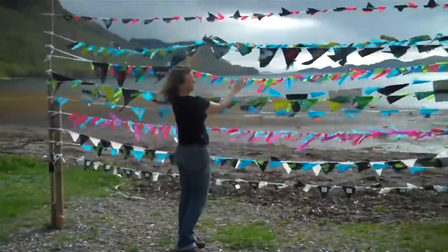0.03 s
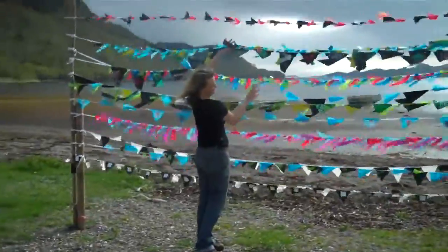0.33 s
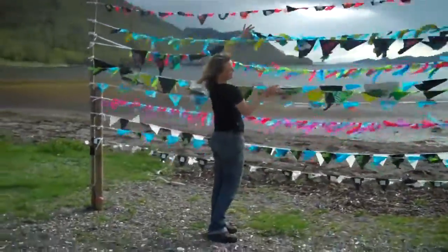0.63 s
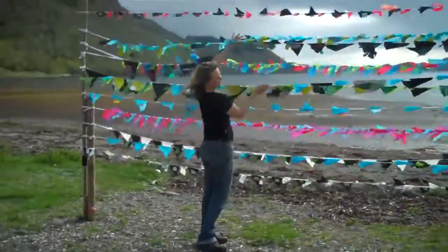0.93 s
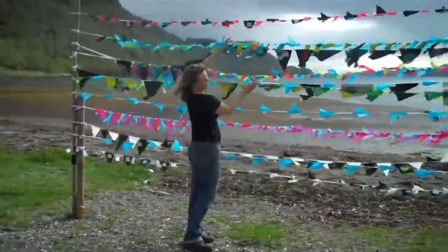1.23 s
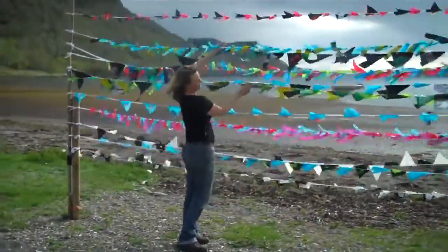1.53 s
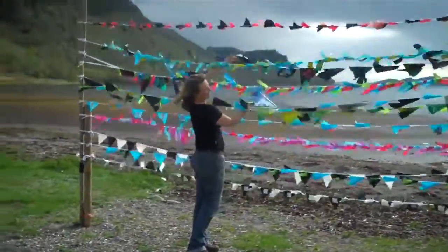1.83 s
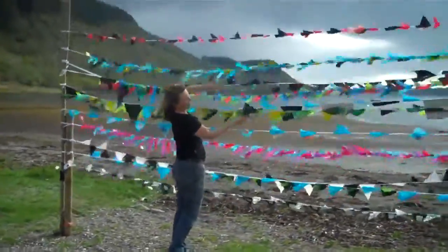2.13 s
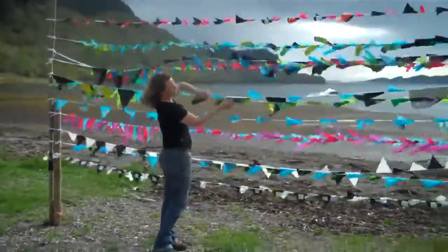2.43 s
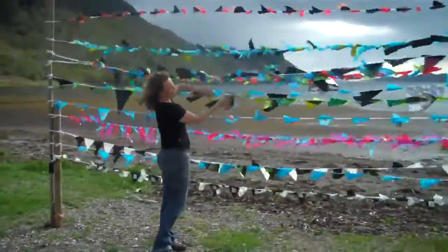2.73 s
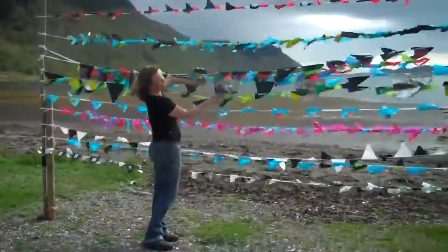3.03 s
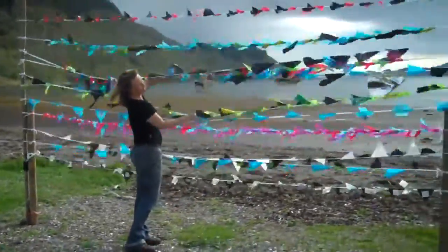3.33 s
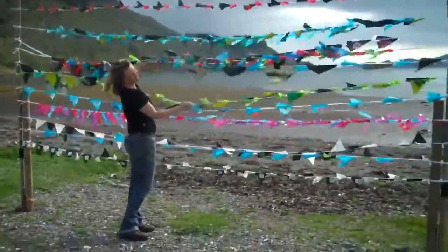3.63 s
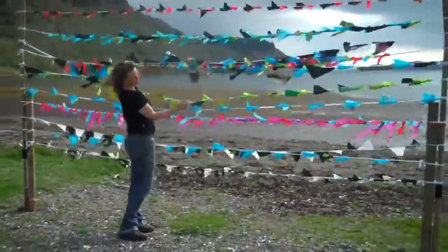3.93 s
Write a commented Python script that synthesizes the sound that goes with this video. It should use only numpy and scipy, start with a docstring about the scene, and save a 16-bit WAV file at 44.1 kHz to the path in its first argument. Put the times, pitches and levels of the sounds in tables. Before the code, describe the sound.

Many plastic flags flutter outdoors in a bright, crackly hiss, with occasional soft swishes and sharp cracks. Uneven wind buffets the microphone throughout, growing stronger on the right side from about halfway.

```python
"""Strings of small plastic flags rustle on an open shore, with wind rumbling on the microphone.
Close by, every flap is a brief spray of crackles; the far flags merge into a hiss. Now and then a slack
flag swishes round, or a near one cracks like a whip. Gusts rumble and thump on the two microphone ports,
mostly the right one, and the hardest thumps make the recorder's limiter duck the rustle."""
import sys
import numpy as np
from scipy import signal
from scipy.fft import rfft, irfft
from scipy.io import wavfile
from scipy.ndimage import uniform_filter1d

SR = 44100
rng = np.random.default_rng(int(sys.argv[2]) if len(sys.argv) > 2 else 0)


def generate_wav(sig):
    """Save sig (samples, or channels by samples) to the path in sys.argv[1] as 16-bit PCM at SR."""
    pcm = np.round(np.clip(np.atleast_2d(sig).T, -1, 1) * 32767).astype(np.int16)
    wavfile.write(sys.argv[1], SR, pcm)


N = 176400
TIME = np.arange(N) / SR
FREQS = np.maximum(np.arange(N // 2 + 1) * SR / N, 1)
CRACKLES_PER_S = 4000   # within a flap or a swish


def from_db(db):
    """Decibels to gain."""
    return 10 ** (np.asarray(db) / 20)


def unit_rms(x):
    """Scale to unit power."""
    return x / np.sqrt(np.mean(x ** 2) + 1e-20)


def in_time(rows):
    """Join (seconds, value) rows into a curve at every sample."""
    return np.interp(TIME, *np.transpose(rows))


def lowpass(x, hz, order=2):
    """Butterworth low-pass."""
    return signal.sosfilt(signal.butter(order, hz, fs=SR, output="sos"), x)


def die_away(kicks, decay_s):
    """Give every kick an exponential tail."""
    return signal.lfilter([1], [1, -np.exp(-1 / (decay_s * SR))], kicks + 1e-18)


def drift(hz):
    """Random motion of spread 1, mostly slower than hz."""
    return unit_rms(irfft(rfft(rng.standard_normal(N)) / (1 + (FREQS / hz) ** 2), N))


def colour(x, table):
    """Minimum-phase filter that follows (Hz, left dB, right dB) rows, scaled to unit mean power gain."""
    hz, *sides = np.transpose(table)
    gain = unit_rms(from_db([np.interp(np.log(FREQS), np.log(hz), side) for side in sides]))
    cepstrum = irfft(np.log(gain), N)
    cepstrum[:, 1:N // 2] *= 2
    cepstrum[:, N // 2 + 1:] = 0
    return irfft(rfft(x) * np.exp(rfft(cepstrum)), N)


def eddies(per_s=60, spread_db=4, decay_s=0.011, rise_hz=258, steady_flow=0.2):
    """Force of the air on a port: a steady flow plus uneven shoves that come fast and die away."""
    rate = per_s * np.exp(np.tanh(drift(per_s)))
    onsets = np.diff(np.floor(np.cumsum(rate) / SR), prepend=0)
    shoves = onsets * from_db(spread_db * rng.uniform(-1.5, 2, N))
    return steady_flow + lowpass(die_away(shoves, decay_s), rise_hz)


# Gusts off the open shore, on the left and right port. Each row: time in seconds, relative level in dB.
GUSTS_LEFT = [(0.0, -22.5), (0.03, -22.5), (0.17, -22.5), (0.2, -29.5), (0.25, -24.5), (0.39, -30),
              (0.51, -27.5), (0.61, -42.5), (0.8, -32), (0.871, -51), (0.99, -24.5), (1.08, -25),
              (1.14, -52), (1.35, -33), (1.41, -23.5), (1.53, -45.5), (1.67, -60), (1.78, -20.5),
              (1.81, -26.5), (1.84, -24), (1.88, -22), (2.18, -49.5), (2.23, -34), (2.34, -25.5),
              (2.49, -50.5), (2.68, -38), (2.718, -22.5), (2.84, -37), (2.95, -23), (2.99, -29),
              (3.23, -45), (3.27, -29), (3.3, -44), (3.48, -20.5), (3.54, -31), (3.57, -32.5), (3.6, -30),
              (3.7, -30.5), (3.92, -27), (3.99, -41)]
GUSTS_RIGHT = [(0.0, -28.5), (0.04, -25.5), (0.14, -21.0), (0.17, -27), (0.24, -26.0), (0.38, -35.0),
               (0.5, -23.5), (0.56, -33), (0.62, -24), (0.65, -32.5), (0.68, -24), (0.91, -26.5),
               (0.94, -23.0), (1.18, -37), (1.22, -23), (1.36, -27.5), (1.42, -36), (1.46, -29.5),
               (1.53, -33.5), (1.56, -27.5), (1.59, -38), (1.68, -37.5), (1.8, -28.5), (1.83, -16.5),
               (1.921, -14.5), (1.95, -24), (1.97, -27.0), (2.14, -32), (2.17, -18), (2.19, -25),
               (2.31, -27), (2.35, -35.0), (2.44, -27.5), (2.47, -38.5), (2.59, -30.5), (2.64, -37),
               (2.7, -26), (2.74, -29.0), (2.78, -19.0), (2.98, -15.5), (3.01, -20.0), (3.14, -14),
               (3.2, -27.0), (3.24, -22), (3.29, -32), (3.44, -16.0), (3.47, -19), (3.63, -28.5),
               (3.77, -29.0), (3.8, -24.5), (3.87, -35.5), (3.97, -21.5), (3.99, -30.5)]
# Their rumble at the microphone. Each row: frequency in Hz, left and right relative level in dB.
RUMBLE_SPECTRUM = [(20, -25, -32), (45, -21, -16), (86, 1.5, -4), (172, 4, 0.5), (275, -2.5, -0.5),
                   (454, -6, -7.5), (678, -12, -13), (1068, -19, -24), (2030, -33, -40.5), (4000, -56, -61)]


def wind(trims_db=(-1, 0.8), references_db=(-26, -14.5), bright_above_hz=490, bright_db_per_db=0.51):
    """Lumpy rumble, separate on each port; stronger wind stirs finer eddies and sounds brighter."""
    rumbles = colour(rng.standard_normal((2, N)), RUMBLE_SPECTRUM)
    ports = []
    for rumble, gusts, trim, reference in zip(rumbles, (GUSTS_LEFT, GUSTS_RIGHT), trims_db, references_db):
        lumps = np.abs(eddies())
        lumps /= np.sqrt(uniform_filter1d((lumps * rumble) ** 2, size=2600))   # even power over 59 ms
        force = from_db(in_time(gusts) + trim) * lumps
        coarse = irfft(rfft(rumble) / (1 + (FREQS / bright_above_hz) ** 4), N)
        fine = (rumble - coarse) * (force / from_db(reference)) ** bright_db_per_db
        ports.append(force * (coarse + fine))
    return np.array(ports)


# Eddies striking the microphone itself. Each row: centre in seconds, left and right level of the swing
# in dB, pitch in Hz, half length in seconds.
EDDY_HITS = [(.152, -7.5, -27.5, 350, 0.0019), (.248, -12, -18, 272, 0.0025),
             (0.332, -23.5, -32, 480, 0.0047), (0.476, -25, -34, 436, 0.002),
             (0.677, -14.5, -39.5, 266, 0.0016), (0.834, -32, -21, 455, 0.0015),
             (0.929, -20, -13, 157, 0.0037), (1.008, -18.5, -24, 645, 0.00055),
             (1.054, -26, -27, 543, 0.0026), (1.412, -19, -39, 400, .0015), (1.429, -15, -39, 550, 0.00083),
             (1.766, -5.5, -32, 403, 0.0011), (1.818, -43, -1.5, 287, .003), (1.849, -23, -10, 565, 0.0024),
             (1.878, -30, -3, 465, 0.00068), (1.917, -35.5, -3, 426, 0.0011),
             (2.167, -45.5, -8.5, 484, 0.0027), (2.222, -29, -4.5, 387, 0.0038),
             (2.280, -22, -8, 223, 0.002), (2.33, -15.5, -47, 388, 0.0021),
             (2.711, -13, -28.5, 750, 0.00046), (2.785, -33, -13, 408, 0.003),
             (2.835, -38.5, -8, 282, 0.0032), (2.911, -13, -5.5, 211, 0.0026),
             (2.921, -35.5, -1, 213, 0.0037), (2.964, -13, 6, 650, 0.00058), (2.971, -13.5, 2, 281, 0.0044),
             (3.055, -29.5, -7, 330, 0.0013), (3.121, -26, -1.5, 410, 0.0013),
             (3.236, -32, -6, 273, 0.0012), (3.317, -34, -12.5, 246, 0.0038), (3.392, -27, -5, 308, 0.0013),
             (3.422, -18.5, -10.5, 200, 0.0013), (3.457, -11, 1, 267, 0.0036),
             (3.646, -23, -15.5, 420, 0.0017), (3.702, -10.5, -23, 260, 0.0026)]


def thumps(roughness=0.23, rough_hz=1990, growth=0.57):
    """Single eddies: a pressure swing of a cycle or two, the more ragged and bright the harder it hits."""
    out = np.zeros((2, N))
    for centre_s, left_db, right_db, hz, half_s in EDDY_HITS:
        span = np.abs(TIME - centre_s) < .03
        age = TIME[span] - centre_s
        strength = from_db([[left_db], [right_db]])
        violence = strength.max() ** growth   # 1 for a full-scale hit
        top_hz = min(rough_hz * violence, SR / 4)
        ragged = unit_rms(lowpass(rng.standard_normal((2, SR // 10)), top_hz, order=6))[:, :len(age)]
        swing = np.sin(2 * np.pi * (hz * age + rng.random()))
        envelope = strength * np.exp(-(age / half_s) ** 2)
        out[:, span] += envelope * (swing + roughness * violence * ragged)
    return out


# Slack flags, heard alike on both ports. Each row: centre in seconds, level in dB.
SLACK_SWEEPS = [(.285, -41), (.385, -39), (.435, -37.5), (.60, -46), (.72, -42.5), (.92, -42), (1.065, -41),
                (2.70, -36), (3.87, -42)]


def swishes(centre_hz=2750, log_width=0.53, half_s=0.016):
    """A slack flag sweeps round with a duller swish: a brief swell of soft midrange crackle."""
    grains = rng.standard_normal(N) * (rng.random(N) < CRACKLES_PER_S / SR)
    band = np.exp(-(np.log(FREQS / centre_hz) / log_width) ** 2 / 2)
    crackle = unit_rms(irfft(rfft(grains) * band, N))
    swells = sum(from_db(db) * np.exp(-((TIME - s) / half_s) ** 2) for s, db in SLACK_SWEEPS)
    return crackle * swells


def flag_string(effort_db, flaps_per_s=22, jitter=.25, flap_spread_db=6.5, crackle_spread_db=2.5,
                swell_db=3, near_db=-6, far_db=-2):
    """A near flag flaps unevenly, faster in more wind, each flap a dying spray over the far flags' hiss."""
    rate = flaps_per_s * from_db(effort_db / 2) * np.exp(jitter * (rng.normal() + drift(hz=10)))
    onsets = np.diff(np.floor(rng.random() + np.cumsum(rate) / SR), prepend=0)
    flaps = onsets * from_db(flap_spread_db * rng.uniform(-1.9, 2, N))
    spray = lowpass(die_away(flaps, decay_s=0.0029), hz=89, order=1)   # each flap takes a moment to build
    clicks = (rng.random(N) < CRACKLES_PER_S / SR) * rng.choice([-1, 1], N)
    crackles = clicks * from_db(crackle_spread_db * rng.uniform(-0.96, 1.1, N))
    swell = from_db(swell_db * np.tanh(drift(hz=2.8)))
    near = from_db(near_db) * unit_rms(spray * crackles * swell)
    far = from_db(far_db) * rng.standard_normal(N)
    return from_db(effort_db) * (near + far)


# How hard the flags flutter in front of the microphone. Each row: time in seconds, relative level in dB.
FLUTTER_EFFORT = [(0, -1), (.27, -2.5), (.5, -1.5), (.6, .5), (.68, -1.5), (.82, -1), (.9, 1), (1.0, -1),
                  (1.14, 0.5), (1.35, -1), (1.53, 1), (1.85, -2.5), (2.1, .5), (2.24, 1), (2.37, 4),
                  (2.56, 4), (2.61, 2), (2.8, 2), (3.02, .5), (3.3, 2.5), (3.52, 0.8), (3.64, 2), (3.82, 1),
                  (3.97, 2)]


def flags(strings=12, ripple_db=0.84, tint_db=1, edge_lag_s=4.5e-5, right_lead_s=2.2e-5):
    """Strings spread across the shore, each with its own colour and its own lag between the ports."""
    effort_db = in_time(FLUTTER_EFFORT) + ripple_db * drift(hz=12)   # all share the breeze's quick changes
    knots_hz = np.geomspace(1000, SR / 2, strings)
    spread = np.linspace(-1, 1, strings)
    spectrum = 0
    for place in spread:
        tint = from_db(-tint_db * np.interp(FREQS, knots_hz, rng.permutation(spread)))
        left_lead_s = place * edge_lag_s - right_lead_s
        arrival = np.exp(1j * np.pi * FREQS * left_lead_s * np.array([[1], [-1]]))
        spectrum = spectrum + rfft(flag_string(effort_db)) * tint * arrival
    return irfft(spectrum, N) / np.sqrt(strings)


# A flag cracks close to the microphone. Each row: start in seconds, level in dB relative to the flutter.
WHIP_CRACKS = [(0.597, 16.5), (1.9421, 22), (2.076, 8.5), (2.303, 5), (2.928, 7.5), (3.162, 14),
               (3.641, 14.5), (3.884, 4), (3.96, 19)]


def snaps(decay_s=0.0011, echo_s=.0055, echo_db=-9, samples=1024):
    """Whip-like cracks, each followed by its echo off the ground."""
    out = np.zeros(N + SR)
    age = np.arange(samples) / SR
    for start_s, db in WHIP_CRACKS:
        crack = from_db(db) * rng.choice([-1, 1], samples) * np.exp(-age / decay_s)
        for delay_s, gain in ((0, 1), (echo_s, from_db(echo_db))):
            start = int((start_s + delay_s) * SR)
            out[start:start + samples] += gain * crack
    return out[:N]


# The flags as each port hears them. Each row: frequency in Hz, left and right relative level in dB.
RUSTLE_SPECTRUM = [(194, -25, 4), (565, -11.5, -8.5), (1160, -8.5, -8), (2010, -6.5, -4),
                   (3100, -2.5, -4.5), (4030, -2.5, -2), (5320, -1.5, 0.5), (6590, 4.5, 3), (7060, 6, 7),
                   (7440, 11.5, -5.5), (8240, 4, -1.5), (8880, -1.5, -19), (10200, -9, -12.5),
                   (11800, -12.5, -26.5), (14700, -17, -34)]


def rustle(level_db=-32):
    """Flutter and cracks reach the microphone through its two resonant ports."""
    return from_db(level_db) * colour(flags() + snaps(), RUSTLE_SPECTRUM)


def scene():
    """Flags in front, wind on the microphone."""
    return rustle() + swishes() + wind() + thumps()


def record(dry, attack_s=0.0043, release_db_per_s=36.5, ceiling=.97, cutoff_hz=14300):
    """Above full scale a limiter ducks both channels; what gets past is clipped, and the top is cut."""
    over_db = np.maximum(20 * np.log10(np.abs(dry).max(axis=0) + 1e-9), 0)
    recovery_db = release_db_per_s * TIME
    held_db = np.maximum.accumulate(over_db + recovery_db) - recovery_db
    pole = np.exp(-1 / (attack_s * SR))
    ducked = dry * from_db(-signal.lfilter([1 - pole], [1, -pole], held_db))
    clipped = ducked / (1 + (ducked / ceiling) ** 8) ** (1 / 8)
    return signal.sosfilt(signal.ellip(10, .1, 80, cutoff_hz, fs=SR, output="sos"), clipped)


dry = scene()
out = record(dry)
generate_wav(out)
```